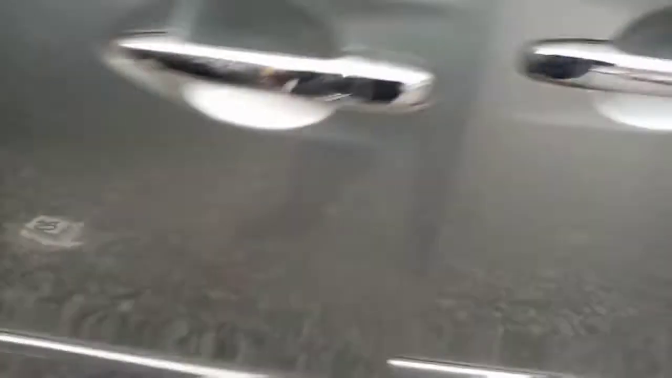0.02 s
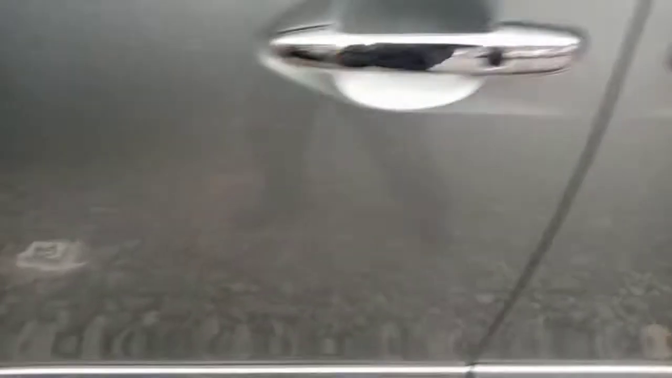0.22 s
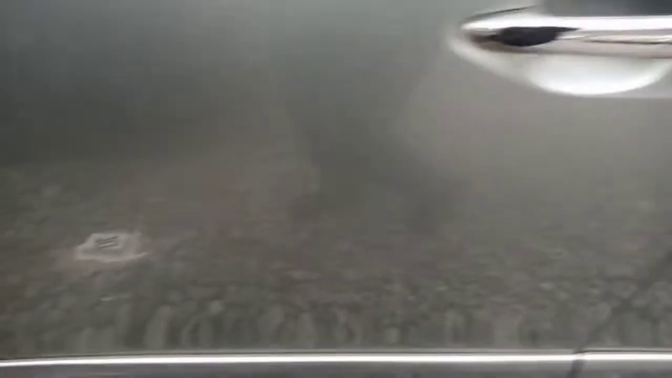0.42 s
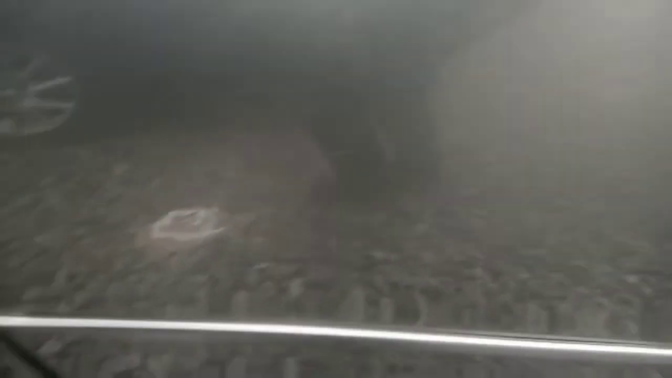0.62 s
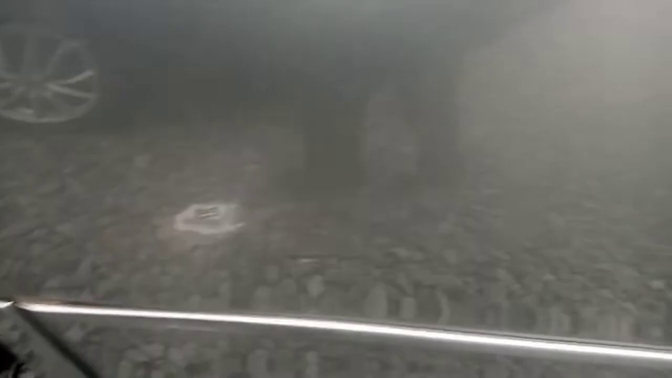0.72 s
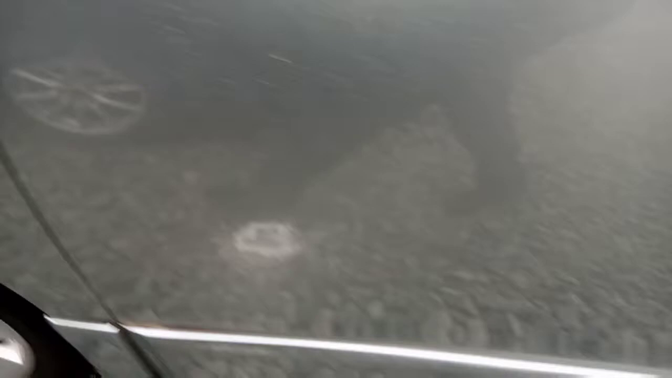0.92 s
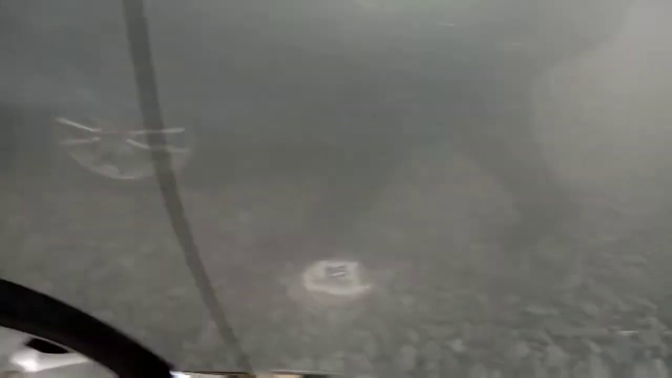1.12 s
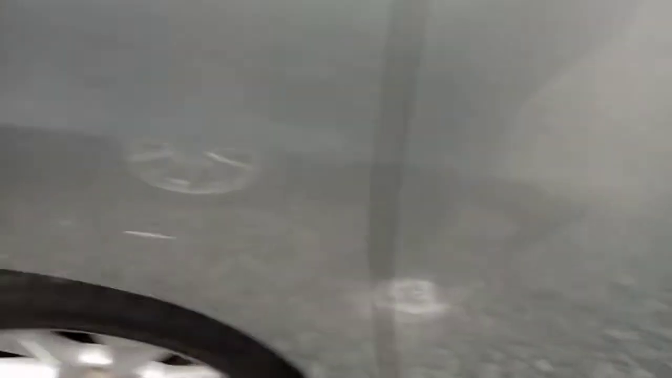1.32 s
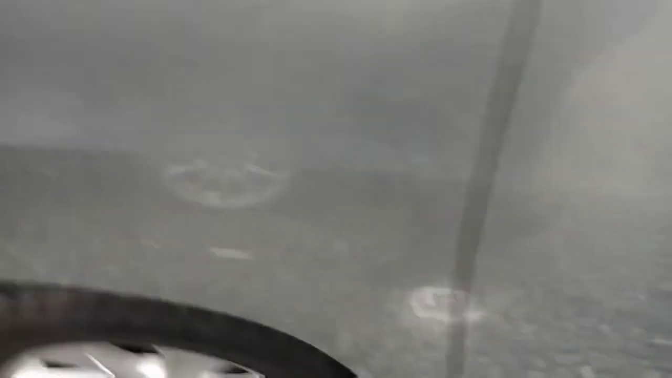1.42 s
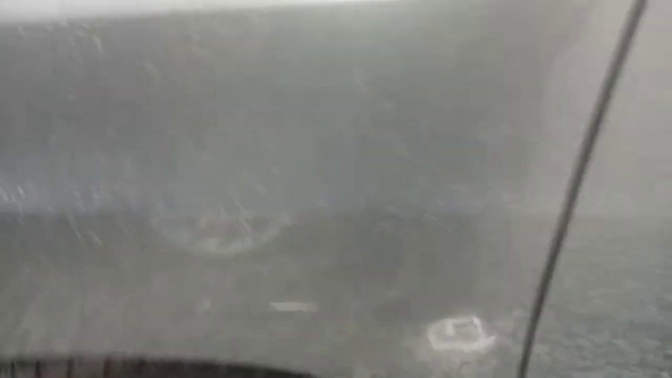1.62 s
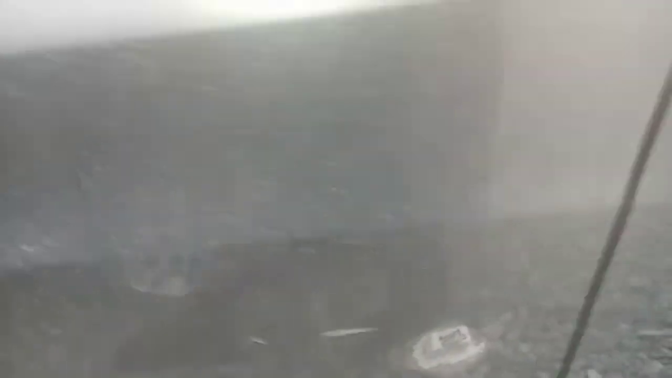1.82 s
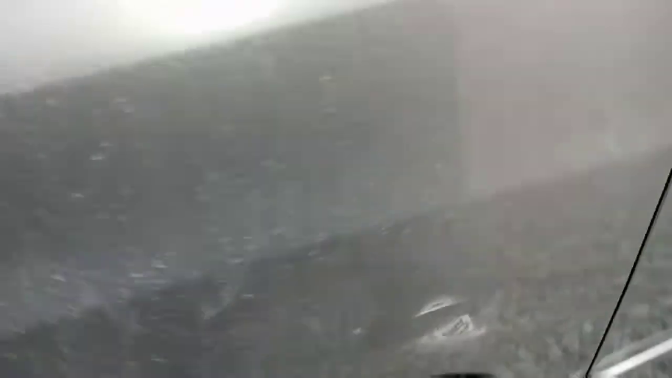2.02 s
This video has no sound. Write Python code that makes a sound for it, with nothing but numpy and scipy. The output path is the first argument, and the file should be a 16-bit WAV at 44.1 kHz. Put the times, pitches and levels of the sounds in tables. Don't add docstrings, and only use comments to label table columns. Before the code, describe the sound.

A car door a few metres away is pushed shut: a small latch click, then a dense low-mid thud with a slight rattle, ringing off yard walls over faint buzz and hiss, on a narrow-band phone microphone.

```python
import sys
import numpy as np
from scipy import signal
from scipy.fft import rfft, irfft, next_fast_len
from scipy.io import wavfile

SR = 44100
rng = np.random.default_rng(int(sys.argv[2]) if len(sys.argv) > 2 else 0)


def to_wav(s):
    ch = np.atleast_2d(s).T
    pcm = np.round(np.clip(ch, -1, 1) * 32767)
    wavfile.write(sys.argv[1], SR, pcm.astype(np.int16))


def makeup_ratio(level_db):
    decades = np.asarray(level_db, float) / 20
    return 10 ** decades


N = 92610


def in_time(rows):
    return np.interp(np.arange(N) / SR, *np.transpose(rows))


def at_hz(rows, hz, col=1):
    rows = np.array(rows)
    return np.interp(np.log(hz), np.log(rows[:, 0]), rows[:, col])


def rms_one(x):
    return x / np.sqrt(np.mean(x ** 2) + 1e-20)


def drift(rate_hz):
    knots = rng.standard_normal(200)
    return np.interp(np.arange(N) / SR * rate_hz, np.arange(200), knots)


def filtered(x, order, hz, kind="low"):
    return signal.sosfilt(signal.butter(order, hz, kind, fs=SR, output="sos"), x)


def ring(push, hz, t60_s):
    r = makeup_ratio(-60 / (t60_s * SR))
    w = 2 * np.pi * hz / SR
    return signal.lfilter([0, np.sin(w)], [1, -2 * r * np.cos(w), r * r], push + 1e-18)


def bands(gain):
    edges_hz = 40 * 2 ** (np.arange(25) / 3)
    white = rng.standard_normal((2, 2, N))
    out = 0
    for k, (lo, hi) in enumerate(zip(edges_hz, edges_hz[1:])):
        out = out + gain(np.sqrt(lo * hi)) * filtered(white[k % 2], 2, [lo, hi], "band")
    return out


# start in seconds, level in dB, contact cut-off in Hz, direction (+-1).
DOOR_KNOCKS = [(.213, -35.5, 900, -1), (0.2272, -28, 800, 1), (.2352, -24, 1100, 1), (0.2459, -23, 900, -1),
               (0.2498, -28, 600, -1), (.264, -24, 836, -1), (.276, -27.5, 697, 1),
               (0.2851, -26.5, 600, -1), (.292, -25, 600, -1), (0.3013, -26.5, 600, -1),
               (0.315, -24.5, 600, 1), (.330, -25.5, 500, -1), (0.351, -34, 500, -1)]
# frequency in Hz, level in dB, t60 in seconds.
PANEL_MODES = [(130, -25, .1), (174, -17, .08), (198, -10.5, 0.14), (278.7, 3.5, 0.051), (354, -7.5, 0.063),
               (393, -4, 0.088), (482, 1.5, 0.077), (536.4, -4.5, 0.053), (611, -9.5, 0.11),
               (670, -3, 0.038), (753, -1, 0.082), (905, -18, 0.056), (1100, -15, 0.05)]
MODE_DB, KNOCK_SPREAD_DB = -13.5, 4.5
PUSH_DB, PUSH_LOW_HZ, PUSH_SOFT_HZ = -1, 140, 1800


def door():
    out = np.zeros(N)
    chance = rng.standard_normal((len(DOOR_KNOCKS), len(PANEL_MODES)))
    for (start_s, db, cut_hz, way), spread in zip(DOOR_KNOCKS, chance):
        start = int(start_s * SR)
        click = np.zeros(N - start)
        click[0] = np.sign(way) * makeup_ratio(db)
        r = np.exp(-2 * np.pi * cut_hz / SR)
        push = signal.lfilter([(1 - r) ** 2], [1, -2 * r, r * r], click)
        push = filtered(push, 2, PUSH_SOFT_HZ)
        for (hz, mode_db, t60_s), c in zip(PANEL_MODES, spread):
            out[start:] += makeup_ratio(mode_db + MODE_DB + KNOCK_SPREAD_DB * c) * ring(push, hz, t60_s)
        thud = filtered(push + 1e-18, 2 + 1, PUSH_LOW_HZ, "high")
        out[start:] += makeup_ratio(PUSH_DB) * thud * np.e / (1 - r)
    return out


# start in seconds, level in dB, decay in seconds.
LATCH_CLICKS = [
    (0.201, -54, 0.011),
    (0.2101, -34.5, 0.0029),
    (0.2177, -46, 0.024),
    (.2355, -42, 0.0045),
    (0.254, -50.5, 0.018),
]
# frequency in Hz, level in dB per Hz.
LATCH_SPECTRUM = [(530, -28.5), (900, -5.5), (2120, -6.5), (2630, -2), (3100, -6.5), (4650, -6.5),
                  (6000, -16.5), (7800, -45), (13200, -120)][:-2]


def latch():
    t = np.arange(N) / SR
    shape = np.zeros(N)
    for start_s, db, decay_s in LATCH_CLICKS:
        shape += makeup_ratio(db) * (t >= start_s) * np.exp(-np.clip(t - start_s, 0, 1) / decay_s)
    noise = bands(lambda hz: makeup_ratio(at_hz(LATCH_SPECTRUM, hz)))[0]
    return shape * rms_one(noise)


# start in seconds, frequency in Hz, peak in dB, swell in seconds, t60 in seconds.
CABIN_BOOMS = [
    (.208, 152.5, -34.5, 0.072, .12),
    (.25, 216.4, -30.5, 0.04, 0.16),
    (0.269, 246.4, -31, 0.027, 0.1),
    (0.276, 82.4, -50, 0.028, 0.43),
    (.215, 354, -40.5, 0.038, 0.32),
    (0.304, 140, -38.5, 0.025, 0.23),
    (.33, 248.3, -42, 0.029, 0.4),
    (0.569, 242, -56, 0.029, 0.067),
    (0.569, 140, -55, .04, 0.15),
]


def cabin():
    t = np.arange(N) / SR
    out = np.zeros(N)
    for start_s, hz, db, swell_s, t60_s in CABIN_BOOMS:
        since = t - start_s
        rise = np.sin(np.pi / 2 * np.clip(since / swell_s, 0, 1))
        fall = makeup_ratio(db - 60 * np.clip(since - swell_s, 0, 9) / t60_s)
        out += fall * rise * np.sin(2 * np.pi * hz * since)
    return out


# time in seconds, level in dB.
BODY_SHUDDER = [(.205, -93), (.211, -43), (.24, -39), (.31, -41), (.35, -46.5), (.45, -60.5), (.6, -81.5)]
# frequency in Hz, level in dB per Hz.
TRIM_SPECTRUM = [(180, -30), (300, 3), (344, -17.5), (661, 1), (1150, -25), (1780, -15), (2020, -17.5),
                 (6000, -29.5), (7800, -62), (13200, -120)][:-2]
RATTLES_PER_S, RATTLE_SIZE_DB, RATTLE_CYCLES = 14000, 1.2, 12.0


def trim():
    sizes = makeup_ratio(RATTLE_SIZE_DB * np.minimum(rng.exponential(1, N), 5)) * rng.choice([-1, 1], N)
    hits = sizes * (rng.random(N) < RATTLES_PER_S / SR)
    part = rng.integers(0, 30, N)
    ticks = np.zeros(N)
    for k, hz in enumerate(np.geomspace(300, 8000, 30)):
        ticks += makeup_ratio(at_hz(TRIM_SPECTRUM, hz)) * hz * ring(hits * (part == k), hz, RATTLE_CYCLES / hz)
    return makeup_ratio(in_time(BODY_SHUDDER)) * rms_one(ticks)


# frequency in Hz, level in dB, t60 in seconds.
YARD_DECAY = [(60, -11.5, 2.2), (105, -7.5, 1.1), (160, -9, 1.4), (400, -7.5, 2.33), (785, -9.5, 1.87),
              (1190, -4, 2.3), (2580, -8.5, 2.1), (5760, -7.5, 2.5)]
YARD_ONSET_S, YARD_SIDE_DB = 0.015, -20


def yard(x):
    t = np.arange(N) / SR

    def decay(hz):
        t60_s = at_hz(YARD_DECAY, hz, col=2)
        return makeup_ratio(at_hz(YARD_DECAY, hz) - 60 * t / t60_s) / np.sqrt(t60_s)

    echo = bands(decay) * (1 - np.exp(-t / YARD_ONSET_S)) * np.sqrt(2 * np.log(1000) / SR)
    size = next_fast_len(2 * N)
    wet = irfft(rfft(x, size) * rfft(echo, size), size)[:, :N]
    return wet * makeup_ratio([[0], [YARD_SIDE_DB]])


# multiple of the 50 Hz buzz pitch, level in dB.
BUZZ_HARMONICS = [(1, -18), (2, -11), (3, -1), (4, -7), (5, -2), (6, -4), (7, -6), (8, -8), (9, -1),
                  (10, -1), (11, -10), (12, -6), (13, -12), (14, 0), (15, -10), (16, -7), (17, -19),
                  (18, -13), (19, -17), (20, -6), (21, -11), (22, -17), (23, -10), (24, -7), (25, -10),
                  (26, -15), (27, -15), (28, -9), (29, -17), (30, -11), (31, -12), (32, -14), (33, -15),
                  (34, -19), (35, -17), (36, -13), (37, -16), (38, -10), (39, -16), (40, -14), (41, -11),
                  (42, -15), (43, -13), (44, -15), (45, -15), (46, -15), (47, -20), (48, -17), (49, -15),
                  (50, -14)]
# multiple of the 50 Hz buzz pitch, level in dB.
BUZZ_UPPER = [(54, -38), (60, -13.5), (73, -12.5), (74, -13.5), (83, -12), (88, -13.5), (96, -20),
              (98, -10.5), (101, -19), (114, -11.5), (118, -27.5)]
# time in seconds, gain in dB.
BUZZ_GAIN = [(0, -2.5), (.1, -6), (.17, -3.5), (.35, -3.5), (.55, -2), (1.0, -1.75), (1.5, -3.06),
             (1.85, -4.5), (2.1, -5)]
BUZZ_HZ, BUZZ_DB = 50, -64.5
BUZZ_HIGH_DB, BUZZ_FALL_DB_PER_KHZ, BUZZ_SCATTER_DB = -18, 2.5, 6.5


def buzz():
    high = np.arange(len(BUZZ_HARMONICS) + 1, 200)
    fall_db = BUZZ_FALL_DB_PER_KHZ * (high - high[0]) * BUZZ_HZ / 1000
    high_db = BUZZ_HIGH_DB - fall_db + BUZZ_SCATTER_DB * rng.uniform(-1.2, 1, len(high))
    levels = makeup_ratio(np.r_[np.array(BUZZ_HARMONICS)[:, 1], high_db])
    for multiple, db in BUZZ_UPPER:
        levels[round(multiple) - 1] = makeup_ratio(db)
    phases = np.exp(2j * np.pi * rng.random(len(levels)))
    cycle = irfft(np.r_[0, levels * phases], SR // BUZZ_HZ) * SR / BUZZ_HZ / 2
    return makeup_ratio(BUZZ_DB + in_time(BUZZ_GAIN)) * np.resize(cycle, N)


# frequency in Hz, level in dB per Hz.
AIR_SPECTRUM = [(40, -5), (100, -10.5), (220, -1), (500, -12), (1000, -11.5), (2500, -13), (5500, -18.5),
                (8000, -24)]
# frequency in Hz, extra side level in dB.
AIR_WIDTH = [(60, 7.5), (300, -0.5), (1000, 3.5), (6000, 5)]
AIR_DB, AIR_SIDE_DB, AIR_PATCHY_DB = -61, -17.5, 0.5


def air():
    together = drift(7.95)

    def gain(hz):
        patchy_db = AIR_PATCHY_DB * (together + drift(9.94))
        return makeup_ratio(at_hz(AIR_SPECTRUM, hz) + patchy_db) * makeup_ratio([[0], [at_hz(AIR_WIDTH, hz)]])

    return makeup_ratio(AIR_DB) * rms_one(bands(gain)) * makeup_ratio([[0], [AIR_SIDE_DB]])


DOOR_TOP_HZ = 6960
SIDE_SLAM_DB, SIDE_FLICKER_DB, SIDE_HUM_DB = -36, 3.5, -81


def scene():
    slam = filtered(door() + latch() + cabin() + trim(), 4, DOOR_TOP_HZ)
    echo, echo_side = yard(slam)
    hiss, hiss_side = air()
    hum = np.sin(2 * np.pi * 6 * BUZZ_HZ * np.arange(N) / SR)
    mid = slam + echo + buzz() + hiss
    side = echo_side + makeup_ratio(SIDE_SLAM_DB) * np.roll(slam, 40)
    side += makeup_ratio(SIDE_FLICKER_DB * drift(16)) * hiss_side + makeup_ratio(SIDE_HUM_DB) * hum
    return np.array([mid + side, mid - side])


def low_pass(x):
    return signal.sosfilt(signal.butter(12, 9690, fs=SR, output="sos"), x)


LOW_CUT_HZ, TOP_HZ, OFFSET = 87, 6480, 0.0013


def record(dry):
    x = filtered(dry, 2, LOW_CUT_HZ, "high")
    x = filtered(x, 7, TOP_HZ)
    return low_pass(x + OFFSET)


dry = scene()
out = record(dry)
to_wav(out)
```